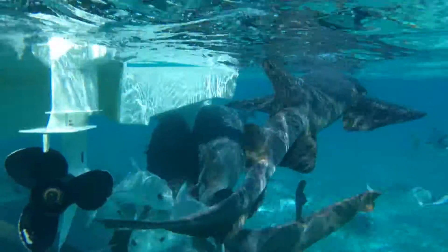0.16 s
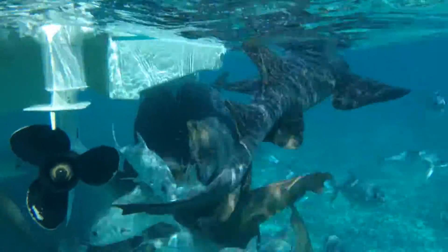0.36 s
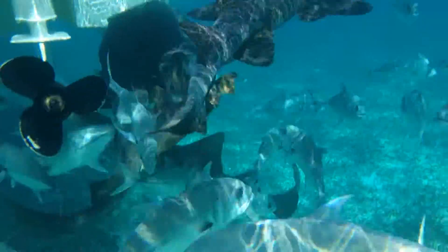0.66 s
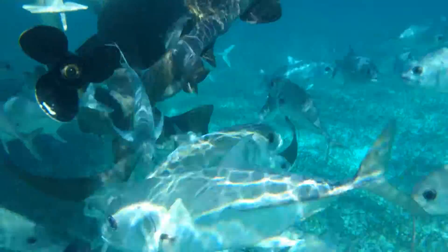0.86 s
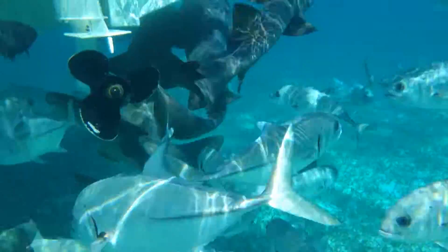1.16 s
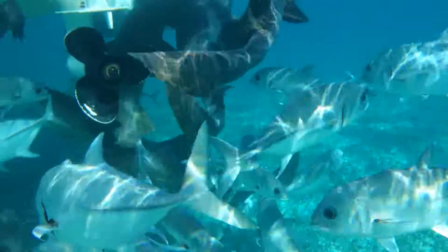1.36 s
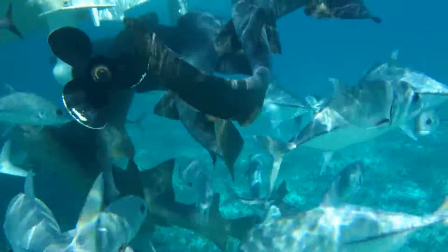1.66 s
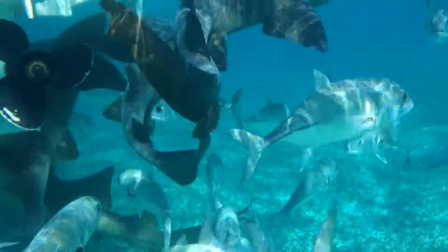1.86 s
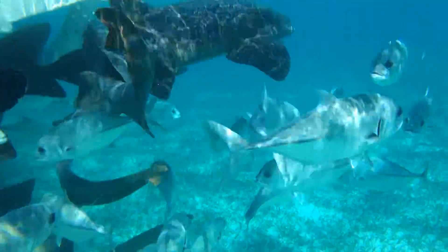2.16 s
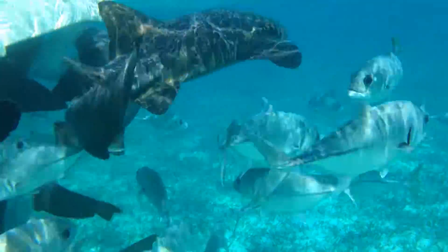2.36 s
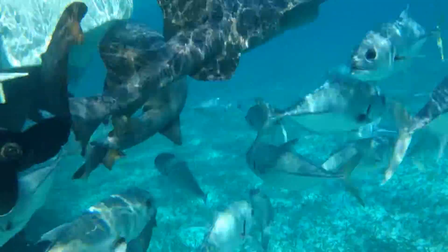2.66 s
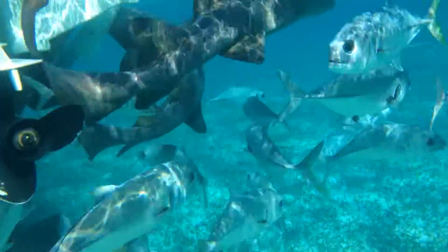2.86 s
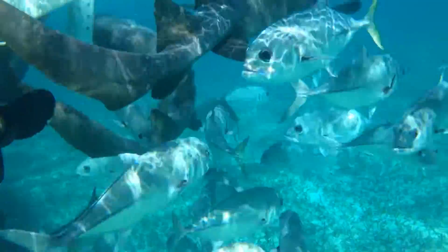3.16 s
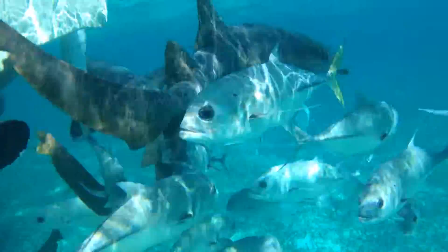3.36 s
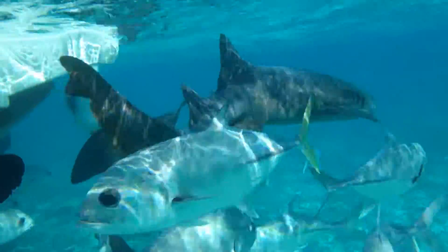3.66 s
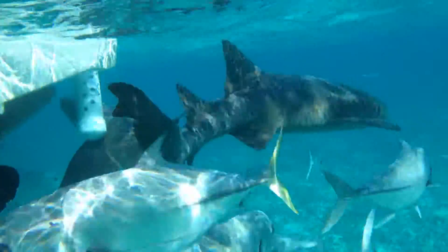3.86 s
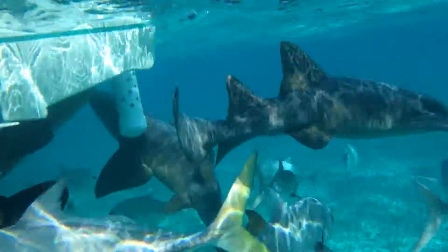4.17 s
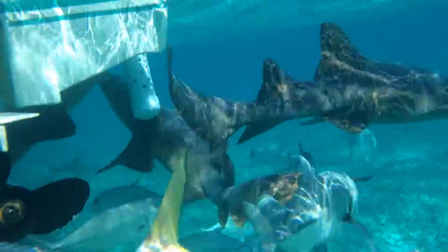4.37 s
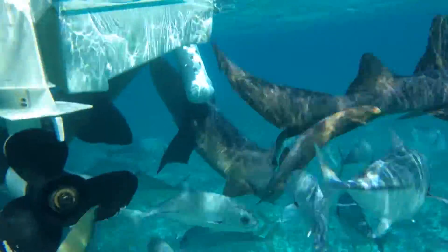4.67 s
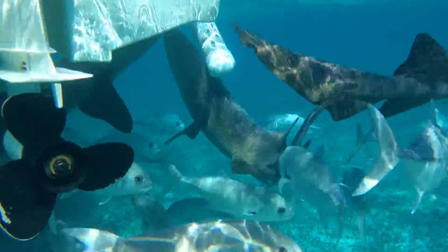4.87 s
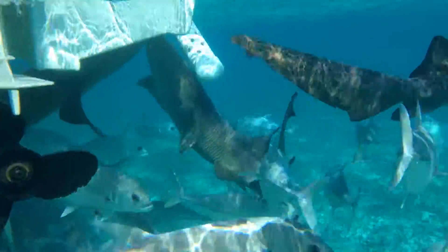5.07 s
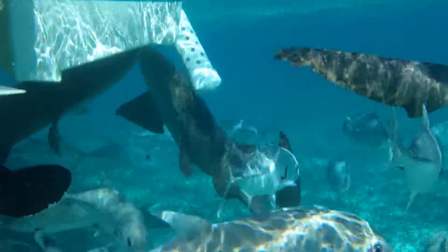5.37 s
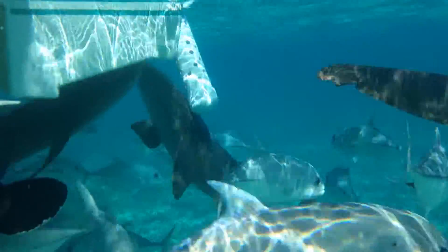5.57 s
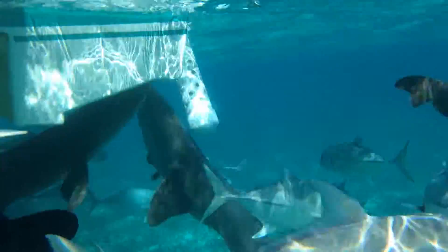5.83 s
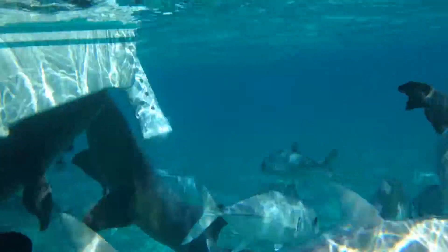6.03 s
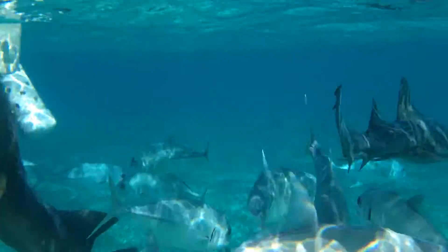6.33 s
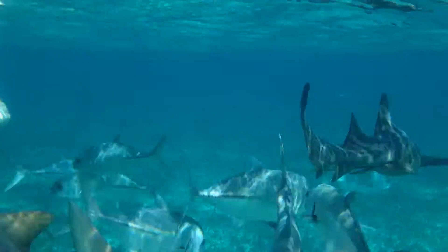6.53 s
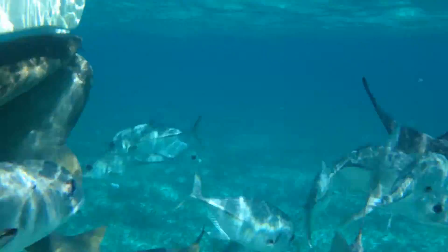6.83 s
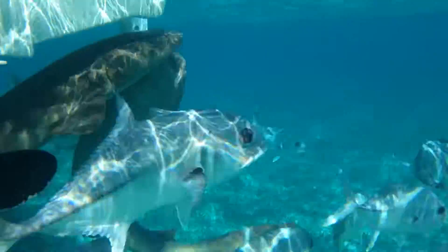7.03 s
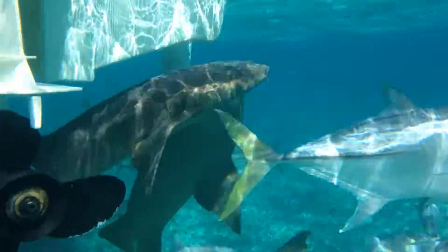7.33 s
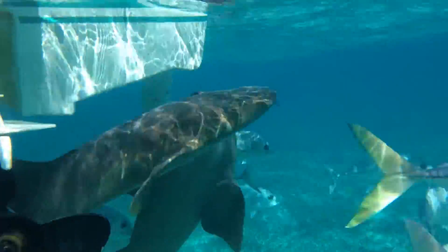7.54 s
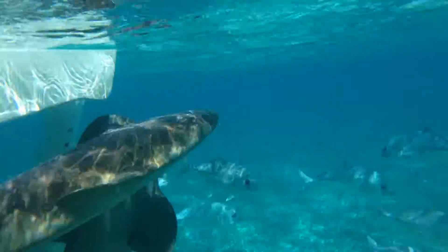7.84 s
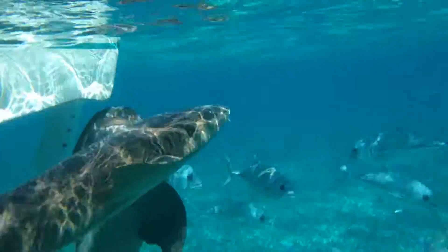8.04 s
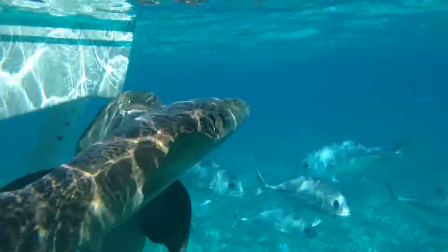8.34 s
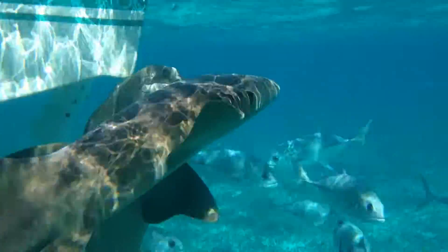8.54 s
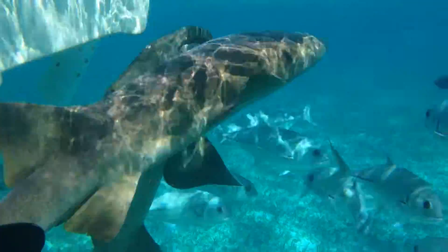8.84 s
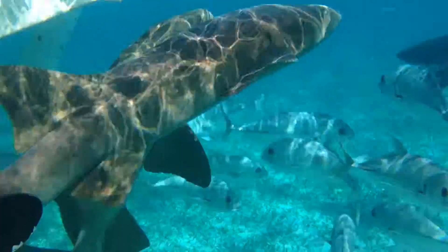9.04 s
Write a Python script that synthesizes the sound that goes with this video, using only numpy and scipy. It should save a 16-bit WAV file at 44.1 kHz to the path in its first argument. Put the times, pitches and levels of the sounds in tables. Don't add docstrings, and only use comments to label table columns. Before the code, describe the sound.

Underwater beside a boat, two idling engines run throughout with a fast, slightly uneven throb, low hum and dull valve clatter. Hollow gulps and gurgles of gas knock near the start, around three seconds and after five. Small clicks hit the sealed housing of the drifting microphone. The sound is close, boxy and muffled, growing fuller and stronger towards the end.

```python
import sys
import numpy as np
from scipy import signal
from scipy.fft import rfft, irfft, next_fast_len
from scipy.io import wavfile
from scipy.ndimage import uniform_filter1d, minimum_filter1d, map_coordinates

SR = 44100
rng = np.random.default_rng(int(sys.argv[2]) if len(sys.argv) > 2 else 0)


def master_out(mix):
    frames = np.transpose(np.atleast_2d(mix))
    ceiling = np.clip(frames, -1, 1)
    pcm = np.round(ceiling * 32767).astype(np.int16)
    wavfile.write(sys.argv[1], SR, pcm)


def how_loud(loudness_db):
    steps = np.asarray(loudness_db, float) / 20
    return 10 ** steps


N = 405719
T = np.arange(N) / SR
CYCLE_HZ = 9.7283


def unit(x):
    return x / np.sqrt(np.mean(x ** 2) + 1e-20)


def curves(rows):
    s, *cols = np.transpose(rows)
    return [np.interp(T, s, c) for c in cols]


def wobble(rate_hz):
    return map_coordinates(rng.standard_normal(int(N * rate_hz / SR) + 4), [T * rate_hz])


def coloured(x, spectrum, lo_hz=0, hi_hz=1e6):
    m = next_fast_len(N + 8192)
    hz = np.fft.rfftfreq(m, 1 / SR) + 1
    f, level_db = np.transpose(spectrum)
    gain = how_loud(np.interp(np.log(hz), np.log(f), level_db, -120, -120))
    cut = 1 / np.sqrt((1 + (lo_hz / hz) ** 12) * (1 + (hz / hi_hz) ** 12))
    return unit(irfft(rfft(x, m) * gain * cut, m)[:N])


def add(out, s, piece):
    out[round(s * SR):][:len(piece)] += piece[:N - round(s * SR)]


def ring(db, hz, t60_s, attack_s, length_s=.5):
    t = T[:int(length_s * SR)]
    return how_loud(db - 60 * t / t60_s) * (1 - np.exp(-t / attack_s)) * np.sin(2 * np.pi * hz * t)


# (time [s], loudness [dB], fullness [dB], brightness [dB])
WATER_PATH = [(0, 0.5, 0, 1), (.45, 1, -1, -1), (.62, -3.5, 1.5, -1.5), (1, -7, -0.5, 0), (1.451, 0, -4, 1),
              (2.1, 0.5, -1.5, -0.5), (2.85, 1, -3.5, 1), (3.5, 0, -1.5, -4.5), (3.9, 1, 0.5, -3),
              (4.55, 1, -3.5, 2.5), (5.4, -1.5, -3, 1), (6.1, 1.5, -2, 3.5), (6.7, -0.5, 0, 2.5),
              (7.15, 1.5, 2.5, 4.5), (7.498, 2, 3.5, 1.5), (8.102, 1.5, 5.5, 0), (8.85, 3.5, 2, 0.5),
              (9.2, 2.5, 5.5, 3)]


def layer_db(mean_db, *shares):
    return mean_db + sum(share * (c - c.mean()) for share, c in zip(shares, curves(WATER_PATH)))


def blows(cycle, table, column, width, scatter_db):
    out = np.zeros(N)
    for row in table:
        turn = cycle - row[0] + .5
        size = how_loud(row[column] + scatter_db * rng.standard_normal(int(N / SR * CYCLE_HZ) + 4))
        pulse = np.exp(-((turn % 1 - .5) / width) ** 2)
        out += size[turn.astype(int).clip(0) + 1] * pulse
    return out


# (place [cycles], hull [dB], clatter [dB], tick [dB], sizzle [dB])
NEAR_BLOWS = [(0, -14, -8, 2, -1), (.25, -12, -12, -14, -14), (.38, -12, -12, -11, -10),
              (.77, -7, -4, -6, -12), (.85, -6, -9, -14, -12)]
FAR_BLOWS = [(.98, -7, -5, -12, 0), (.22, -11, -14, -16, -18), (.46, -9, -7, -10, -4),
             (.73, -8, -9, -12, -5)]


def throb(cycles, column, width, scatter_db, base, teeth, repeat):
    near, far = cycles
    gate = base + blows(near, NEAR_BLOWS, column, width, scatter_db)
    gate += blows(far, FAR_BLOWS, column, width, scatter_db)
    gears = 1 + teeth * np.cos(2 * np.pi * 12 * near + .8 * wobble(3))
    size = int(SR / CYCLE_HZ)
    same = sum(rng.standard_normal(size)[(cycle % 1 * size).astype(int) % size] for cycle in cycles)
    flutter = how_loud(0.7 * wobble(90) + 0.16 * wobble(9))
    return gate * gears * flutter * (rng.standard_normal(N) + repeat * same)


def shimmer(x, depth_db):
    z = signal.stft(x, nperseg=2048)[2]
    field = uniform_filter1d(rng.standard_normal(z.shape), size=2, axis=0)
    field = uniform_filter1d(field, size=7, axis=1)
    return signal.istft(z * how_loud(depth_db * unit(field)), nperseg=2048)[1][:N]


# (multiple of the cycle, level [dB rms])
IDLE_ORDERS = [(4, -53.5), (8, -53), (12, -43), (16, -42.5), (20, -48), (24, -52)]
# (time [s], length [s], multiple of the cycle, level [dB rms])
SWELLS = [(-.2, 0.66, 16, -39.5), (1.3, 0.75, 16, -52), (2.2, 1.3, 8, -43), (7.2, 0.99, 8, -48),
          (.1, 1.4, 8, -45), (2.7, 1.93, 16, -36.5), (3.1, 4.4, 12, -44.5), (4.45, 1.35, 8, -32.5),
          (4.7, 0.89, 16, -32.5), (5.7, 0.63, 16, -34), (5.75, 1.35, 8, -32.5), (6.3, 0.92, 12, -40),
          (7, 1.8, 16, -30.5), (7.6, 0.76, 12, -44.5), (8.7, 0.82, 8, -33), (8.8, 0.88, 16, -30)]
# (frequency [Hz], level [dB per Hz])
WASH_SPECTRUM = [(13, -54.5), (22, -31.5), (85, 5), (112, -2.5), (145, 1.5), (198, -1), (250, 3), (312, -2),
                 (385, -5), (420, 1.5), (550, -30), (920, -120)]


def hum(cycle):
    edge_s = .15
    tones = np.zeros(N)
    for k, idle_db in IDLE_ORDERS:
        size = how_loud(idle_db)
        for s, length_s, order, top_db in SWELLS:
            if order == k:
                size = size + how_loud(top_db) * np.clip(np.minimum(T - s, s + length_s - T) / edge_s, 0, 1)
        phase = 2 * np.pi * k * cycle + 0.22 * wobble(3.7)
        tones += size * how_loud(0.43 * wobble(4.9)) * np.sin(phase)
    rise_db_per_s = 0.9836
    wash_db = layer_db(-37, 0, 0, 0.13) + rise_db_per_s * T + wobble(3)
    wash = coloured(how_loud(2.2 * wobble(14)) * rng.standard_normal(N), WASH_SPECTRUM)
    return tones + how_loud(wash_db) * wash


# (frequency [Hz], level [dB per Hz])
BODY_SPECTRUM = [(200, -37), (340, -19), (377, -20), (456, -2), (610, -9), (689, -2), (725, 3.5), (832, -2),
                 (1010, 0), (1100, 0), (1230, -9.5), (1290, -23.5), (1340, -31), (1740, -53), (2950, -120)]
UPPER_SPECTRUM = [(790, -37.5), (1340, -11.5), (1410, 0.5), (1580, 5.5), (1860, -3), (2130, -1.5),
                  (2480, -16), (3220, -51), (5460, -120)]


def hull(cycles):
    low_db, chest_db = layer_db(-32, 2.44, 0.82, 0.99), layer_db(-29, 0.83, 0.76, -0.02)
    peak_db, upper_db = layer_db(-22.5, 2.2, -0.75, -0.05), layer_db(-28.5, 1.13, -0.39, 0.54)
    drive = throb(cycles, column=1, width=0.041, scatter_db=1.5, base=1.9, teeth=0.18, repeat=0.97)
    drive = shimmer(drive, depth_db=2.0)
    out = how_loud(low_db) * coloured(drive, BODY_SPECTRUM, hi_hz=617)
    out += how_loud(chest_db) * coloured(drive, BODY_SPECTRUM, lo_hz=612, hi_hz=870)
    out += how_loud(peak_db) * coloured(drive, BODY_SPECTRUM, lo_hz=1010)
    upper = throb(cycles, column=2, width=0.043, scatter_db=3.5, base=0.96, teeth=0.29, repeat=0.57)
    return out + how_loud(upper_db) * coloured(shimmer(upper, depth_db=1.66), UPPER_SPECTRUM)


# (frequency [Hz], level [dB per Hz])
CLATTER_SPECTRUM = [(1500, -37.5), (2480, -8.5), (2660, 3), (2910, 7), (3240, 0), (3600, -8), (3850, -13.5),
                    (4100, -12), (4400, -17.5), (4800, -23), (5300, -17), (6000, -28.5), (6800, -31),
                    (7400, -51)]
SIZZLE_SPECTRUM = [(5500, -25.5), (6900, -11), (7500, 4), (8500, 1.5), (9500, -3), (11000, -9),
                   (12500, -26), (15300, -19.5)]


def valves(cycles):
    clatter_db = layer_db(-47, 1.15, -0.02, 1)
    tick_db = layer_db(-53.6, 2, -0.5, 1.3) + 1.2 * wobble(2.5)
    sizzle_db = layer_db(-73.5, 1.7, -0.02, 1.3)
    clatter = throb(cycles, column=2, width=0.048, scatter_db=3.5, base=1.0, teeth=0.31, repeat=0.7)
    tick = throb(cycles, column=3, width=0.038, scatter_db=3.0, base=0.56, teeth=0.13, repeat=0.28)
    sizzle = throb(cycles, column=4, width=.027, scatter_db=1.0, base=.1, teeth=.1, repeat=.1)
    out = how_loud(clatter_db) * coloured(clatter, CLATTER_SPECTRUM, hi_hz=3660)
    out += how_loud(tick_db) * coloured(tick, CLATTER_SPECTRUM, lo_hz=3750)
    return out + how_loud(sizzle_db) * coloured(sizzle, SIZZLE_SPECTRUM)


# (time [s], peak [dB], high mode [dB], low mode [Hz], gurgle [dB])
GULPS = [
    (0.538, -7.5, 1, 300, -20.5),
    (2.389, -17.5, -10.5, 244, -30),
    (3.072, -6.5, -8, 296, -16.5),
    (3.311, -12.5, -42, 298, -17),
    (5.543, -9.5, 3.5, 285, -9),
    (6.979, -21, 0.5, 262, -21),
]
# (time [s], peak [dB], frequency [Hz], t60 [s])
SURGES = [(0.611, -10.5, 279, 0.065), (0.646, -12.5, 252, 0.087), (0.691, -17, 284, 0.034),
          (0.744, -20, 290, 0.12), (1.551, -22, 245, 0.15), (3.141, -12, 270, 0.11),
          (3.209, -8, 296, 0.051), (3.232, -8, 246, 0.074), (3.68, -16, 300, 0.13),
          (1.147, -1.5, 263, 0.0088), (5.188, -4.5, 300, 0.02), (5.194, -2, 944, 0.096),
          (5.614, -4.5, 285, 0.13), (5.664, 0, 294, 0.033), (5.695, -5, 266, 0.044),
          (5.785, -9, 320, 0.044), (6.821, -13, 89, 0.17), (6.97, -20, 75, .16)]


def gulps():
    out = np.zeros(N)
    for s, db, high_db, low_hz, gurgle_db in GULPS:
        add(out, s, ring(db + 6, low_hz, t60_s=.07, attack_s=0.0024))
        add(out, s, ring(db + high_db + 7.5, 500, t60_s=0.043, attack_s=0.0025))
        for u, pitch, size in rng.random((70, 3)):
            bubble_db = db + gurgle_db + 8 * size - 19 * u
            bubble = ring(bubble_db, 225 + 150 * pitch, t60_s=0.082, attack_s=0.0006, length_s=.15)
            add(out, s + 0.018 + .55 * u, bubble)
    for s, db, hz, t60_s in SURGES:
        add(out, s, ring(db, hz, t60_s, t60_s / 12))
    return signal.sosfilt(signal.butter(2, 70, "high", fs=SR, output="sos"), out)


# (time [s], peak [dB], low edge [Hz], high edge [Hz], t60 [s])
GRIT = [(1.148, -33, 3800, 5800, .013), (1.259, -48, 3500, 5000, .01), (1.312, -25, 1500, 4300, .009),
        (1.32, -30, 4700, 6200, .014), (1.3205, -20.5, 1500, 4700, 0.0077), (1.3365, -42, 3500, 7800, .007),
        (2.609, -66, 6000, 9900, .0075), (3.08, -52, 5000, 13200, .005), (4.533, -36.5, 5200, 7000, .06),
        (4.537, -34, 2500, 5600, 0.089), (4.534, -40, 7500, 12600, .035), (4.555, -51, 4000, 10500, .05),
        (4.746, -54, 9470, 14500, .005), (6.144, -61, 4000, 6900, .011), (6.463, -38, 6500, 11500, 0.012),
        (8.36, -56.5, 7000, 14500, .004), (8.661, -57, 7000, 14500, .0044)]


def grit():
    out = np.zeros(N)
    t = T[:2500]
    for s, db, lo_hz, hi_hz, t60_s in GRIT:
        crack = rng.standard_normal(2500) * how_loud(-60 * t / t60_s) * np.clip(t / 0.00062, 0, 1)
        crack[12] += 5
        crack = signal.sosfilt(signal.butter(5, [lo_hz, hi_hz], "band", fs=SR, output="sos"), crack)
        add(out, s, how_loud(db) * crack / np.abs(crack).max())
    add(out, 4.534, ring(-47, 6476, t60_s=.11, attack_s=.001))
    stream = coloured(rng.standard_normal(N), [(8500, -20), (9600, 0), (10700, -20)])
    return out + how_loud(-71) * stream * np.interp(T, [2.72, 2.74, 2.82, 2.85], [0, 1, 1, 0])


# (centre [Hz], half width [Hz], bias [0-1])
FADING_BANDS = [(1330, 45, .3), (2480, 51, 0.33), (3630, 88, .35), (4400, 80, .2), (4870, 90, .2)]


def band_fades(x):
    m = next_fast_len(N + 8192)
    hz, spectrum = np.fft.rfftfreq(m, 1 / SR), rfft(x, m)
    lost = 0
    for centre_hz, width_hz, bias in FADING_BANDS:
        depth = np.clip(bias + .8 * wobble(5) + 0.74 * wobble(23), 0, 1)
        band = irfft(spectrum * np.exp(-((hz - centre_hz) / width_hz) ** 2), m)[..., :N]
        lost = lost + depth * band
    return x - lost


# (time [s], near lag [cycles], far lag [cycles])
ENGINE_LAG = [(0, .595, .55), (1.03, .55, .5), (2.06, .463, .44), (2.6, .42, .4), (4.1, .41, .36),
              (6.2, .44, .3), (8.2, .452, .265), (9.2, .452, .275)]


def scene():
    cycles = [CYCLE_HZ * T - lag for lag in curves(ENGINE_LAG)]
    return (hum(cycles[0]) + hull(cycles) + valves(cycles) + gulps() + grit())[None]


def top_cut(x):
    return signal.sosfilt(signal.butter(12, 15310, fs=SR, output="sos"), x)


# (time [s], level [dB])
DUCKS = [
    (0, 1.5),
    (.55, -4.5),
    (5.56, -6),
    (8.98, -6.5),
]


def record(dry):
    hiss_db, recover_s, scene_share = -68, 0.64, .3
    hiss = coloured(rng.standard_normal(N), [(4000, 1.5), (9000, -4.5), (12000, -6.0), (15400, -5)])
    duck_db = sum(db * np.clip((T - s) / .015, 0, 1) * np.exp(-np.abs(T - s) / recover_s)
                  for s, db in DUCKS)
    x = band_fades(dry) * how_loud(scene_share * duck_db) + how_loud(hiss_db + duck_db) * hiss
    x = x * np.clip(np.minimum(T, T[-1] - T) / .004, 0, 1)
    need = minimum_filter1d(np.minimum(1, .71 / (np.abs(x) + 1e-9)), size=401)
    return top_cut(x * uniform_filter1d(need, size=301))


dry = scene()
out = record(dry)
master_out(out)
```